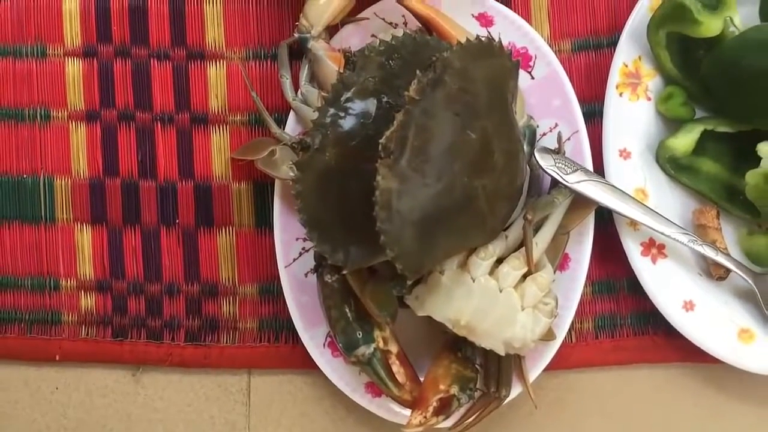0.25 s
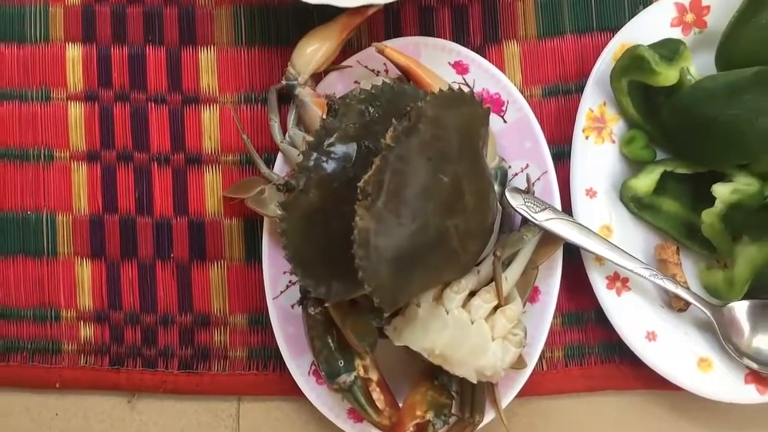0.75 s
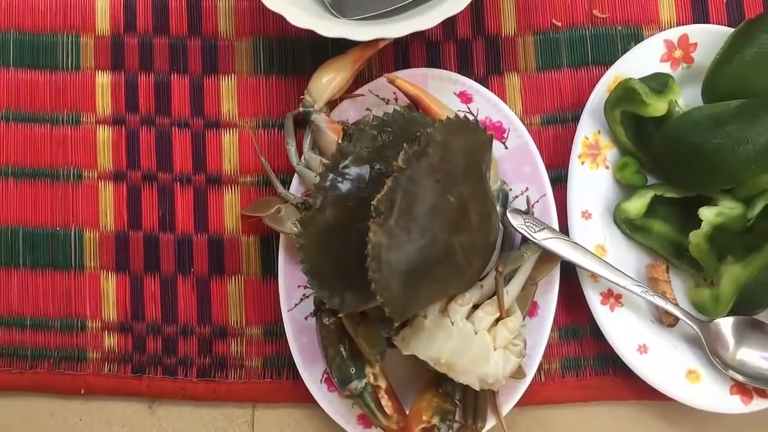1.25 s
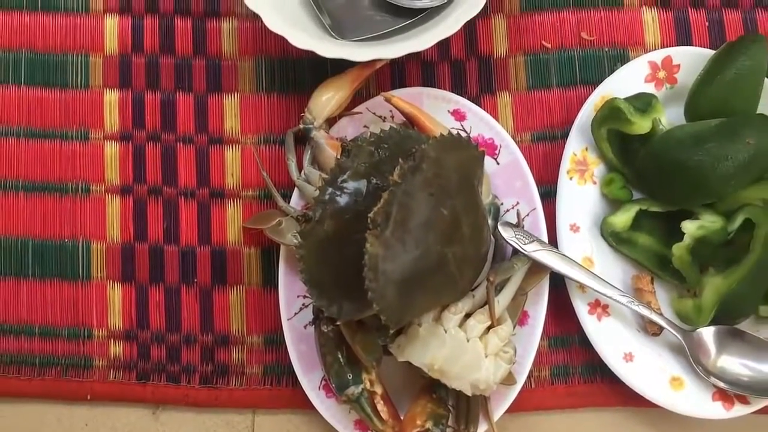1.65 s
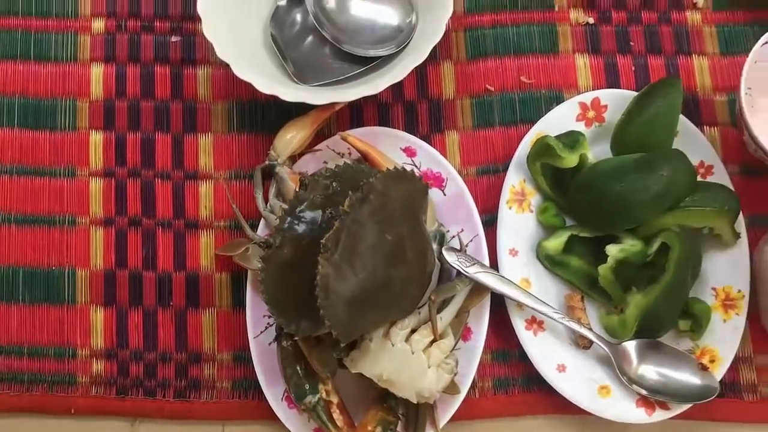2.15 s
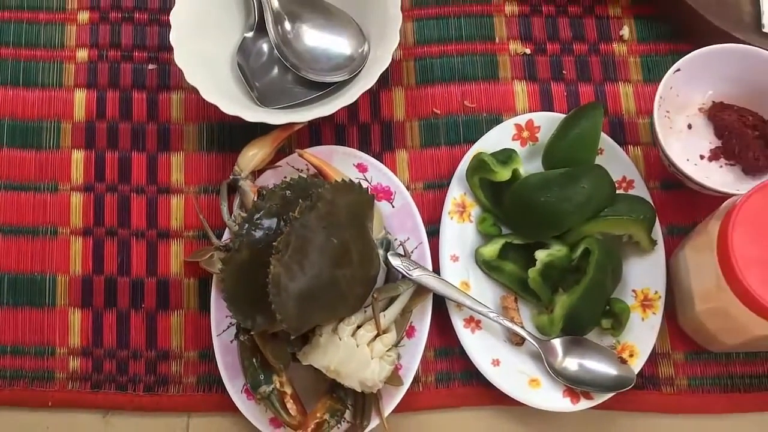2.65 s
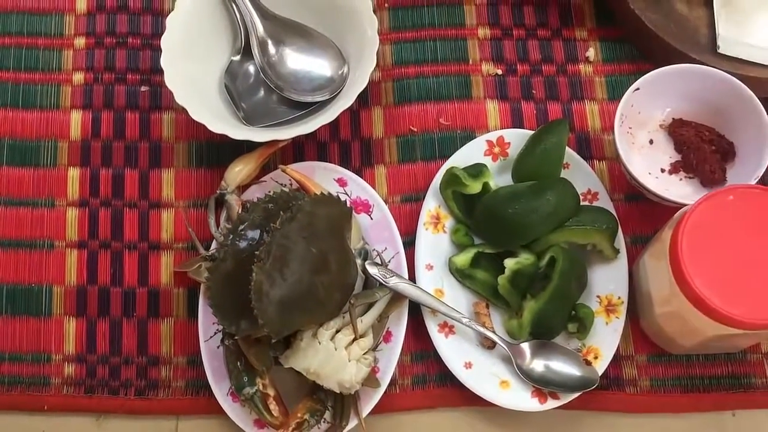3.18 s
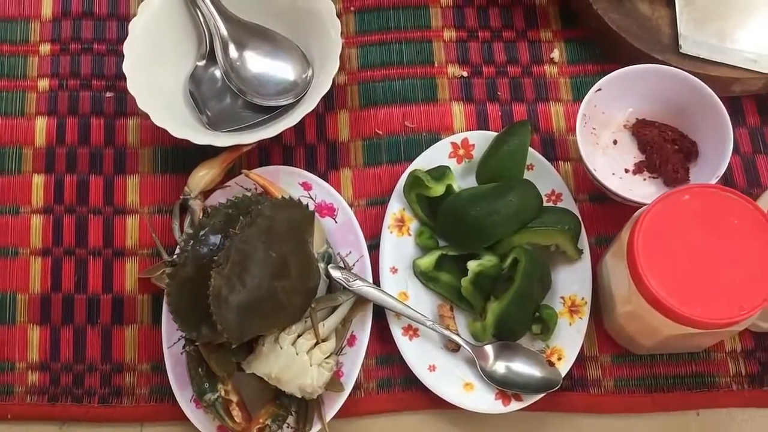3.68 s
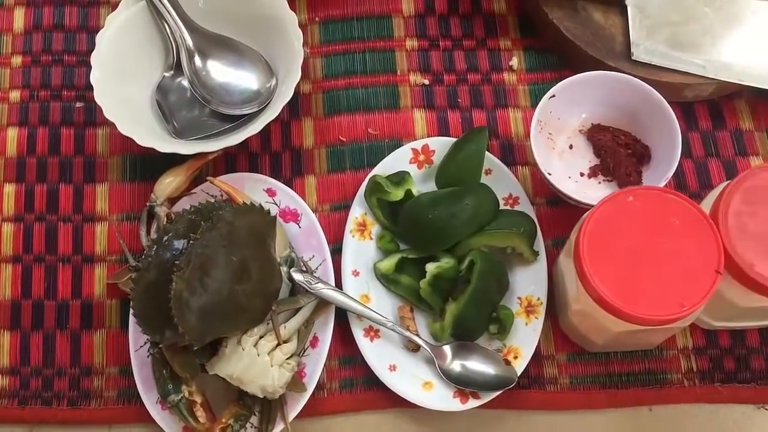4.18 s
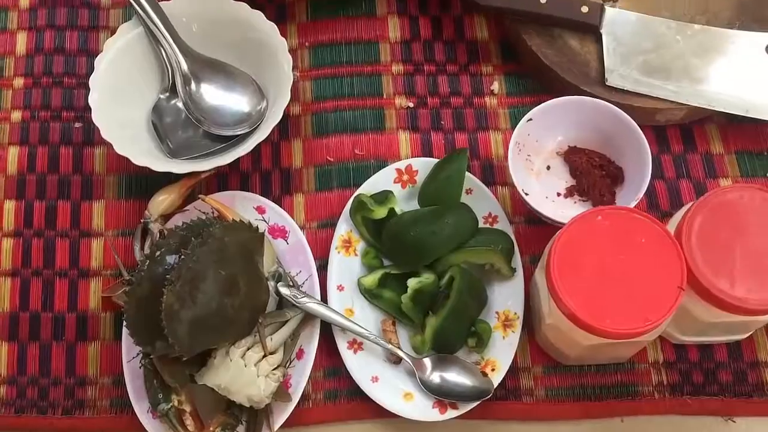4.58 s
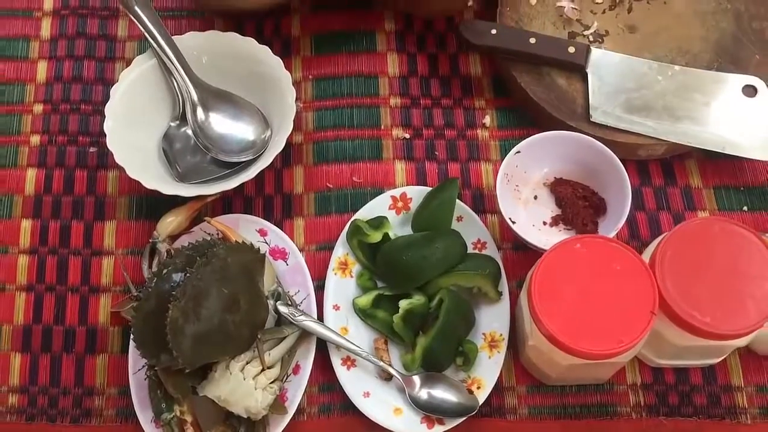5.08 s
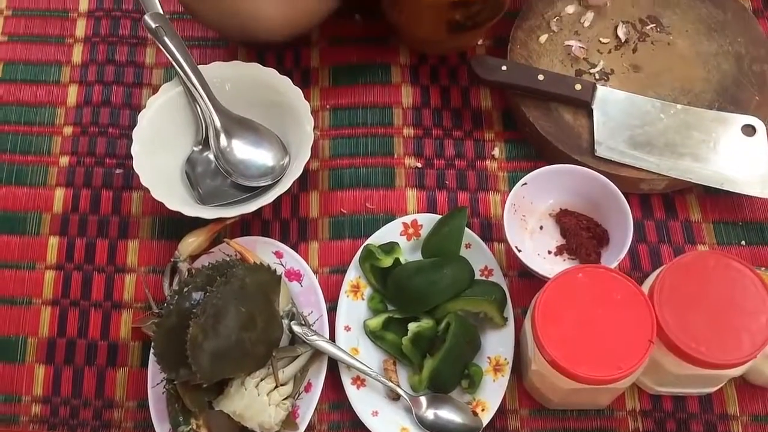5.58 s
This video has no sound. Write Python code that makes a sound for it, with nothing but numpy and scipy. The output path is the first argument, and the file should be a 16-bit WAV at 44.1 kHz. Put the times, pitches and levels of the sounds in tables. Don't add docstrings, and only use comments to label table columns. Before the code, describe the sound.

Close to a phone microphone, a wooden pestle pounds garlic in a clay mortar about every fifth of a second. Early hard knocks give way to muffled thuds, some nearly inaudible; a rim blow rings, then loud sharp knocks return before rim taps and two soft closing blows. Small bare tiled room, short reflections, low wavering traffic hum and hiss.

```python
import sys
import numpy as np
from scipy import signal
from scipy.fft import rfft, irfft
from scipy.io import wavfile
from scipy.ndimage import uniform_filter1d

SR = 44100
rng = np.random.default_rng(int(sys.argv[2]) if len(sys.argv) > 2 else 0)


def makeup_ratio(level_db):
    decades = np.asarray(level_db, float) / 20
    return 10 ** decades


def unload_audio(sound):
    columns = np.transpose(np.atleast_2d(sound))
    steps = np.round(np.clip(columns, -1, 1) * 32767)
    wavfile.write(sys.argv[1], SR, steps.astype(np.int16))


N = 257103

RIM_ROOM_DB = -5.5


def pestle():
    air, walls, slab = np.zeros((3, N))
    blows = [(row, 0) for row in soft_blows() + hard_blows()]
    blows += [(row, RIM_ROOM_DB) for row in rim_blows()]
    for (s, db, contact_ms, *how), room_db in blows:
        near, thud = blow(db, contact_ms, *how)
        start = s + 0.0032 - 0.000736 * contact_ms
        add(air, start, near)
        add(walls, start, near * makeup_ratio(room_db))
        add(slab, start, thud)
    return air, walls, slab


# start in seconds, blow in dB, contact time in ms,
# wall ring in dB, floor thud in dB.
SOFT = [(0.089, -7.5, 1.68, -13.5, -9), (0.706, -13, 1.7, -10, -4.5), (0.921, -31, 3.5, -6, -0.5),
        (1.125, -18, 3.8, -11, -2), (1.344, -19, 3.47, -13, -2.5), (1.771, -19.5, 3.1, -10.5, -5.5),
        (2.203, -33, 5.8, -2, -5), (2.416, -32.5, 3.7, -11, -18), (2.853, -10, 1.16, -4.5, -14),
        (3.907, -8, 2.03, -7.5, -16.5), (5.396, -12, 2.46, -9.5, -6.5), (5.615, -17, 3, 2, -6.5)]
SKIN_TICK_DB, SKIN_SHAFT_DB = -39, -51


def soft_blows():
    return [(s, db, ms, bowl_and_wall(wall_db), thud_db, SKIN_TICK_DB - db, SKIN_SHAFT_DB - db)
            for s, db, ms, wall_db, thud_db in SOFT]


# start in seconds, blow in dB, contact time in ms, shaft in dB, dry tick in dB.
HARD = [
    (0.299, 1, 0.87, -40, -27.5),
    (0.503, -4.5, 1, -48, -25.5),
    (3.484, -1, 0.51, -44, -46),
    (3.707, 2.5, 0.8, -35, -53),
    (4.122, 2, 0.87, -31, -39),
    (4.335, 3, 0.79, -33, -40.5),
    (4.537, 2.5, 0.72, -30.5, -52),
]
WALL_RING_DB, WALL_DB_PER_MS = -14.5, -21
HARD_THUD_DB = -24


def hard_blows():
    return [(s, db, ms, bowl_and_wall(WALL_RING_DB + WALL_DB_PER_MS * (ms - 1)), HARD_THUD_DB, tick_db, shaft_db)
            for s, db, ms, shaft_db, tick_db in HARD]


# frequency in Hz, level in dB, t60 in seconds.
BOWL = [(310, -6.5, 0.005), (469, -4, 0.0049), (590.6, 5, 0.0056), (651, -2.5, 0.019), (783, -1.5, 0.0025),
        (1860, 4, 0.016), (2015, 9, 0.0042), (2590, 12, 0.0073), (2900, -5, 0.006), (3140, 2.5, 0.014)]
# frequency in Hz, level in dB, t60 in seconds.
WALL = [(1263, 10, 0.013), (1192, -22.5, 0.11), (1213, -22.5, .22), (1484, -12, 0.17), (1102, 6, 0.019),
        (1590, -4.5, 0.035), (2350, -11, 0.094)]


def bowl_and_wall(wall_db):
    return BOWL + [(hz, db + wall_db, t60) for hz, db, t60 in WALL]


# start in seconds, blow in dB, ring t60 in seconds,
# partner mode in Hz, contact time in ms.
RIM = [
    (2.625, -5, 0.18, 1328, 0.49),
    (4.959, -7, 0.076, 1520, 0.79),
    (5.176, -9, 0.087, 1534, 0.91),
]
# frequency in Hz, level in dB, t60 in seconds.
LIP = [(470, -7.5, 0.0037), (722, -12.5, 0.014), (1060, -3.5, 0.0018), (1640, 2.5, 0.0035),
       (2180, 5.5, 0.0068), (2490, 2, 0.0057), (3027, -0.5, 0.022), (342, -12, .012)]
RING_HZ, SPLIT_HZ, RIM_RING_DB = 1432, 14, -9
RIM_PARTNER_DB, PARTNER_T60 = -7, 0.03


def rim_blows():
    rows = []
    for s, db, t60, partner_hz, ms in RIM:
        ring = [(RING_HZ - SPLIT_HZ, RIM_RING_DB, t60),
                (RING_HZ + SPLIT_HZ, RIM_RING_DB - 1, t60),
                (partner_hz, RIM_PARTNER_DB, PARTNER_T60)]
        tick_db, shaft_db = -14 - 26 * ms, -8 - 40 * ms
        rows.append((s, db, ms, LIP + ring, -32, tick_db, shaft_db))
    return rows


# frequency in Hz, level in dB, t60 in seconds.
TICK = [(1400, -2, 0.0023), (2470, -19, 0.0022), (3740, 4, 0.0092), (5820, -5, 0.017), (7900, -6, 0.011),
        (11400, -5, 0.0021)]
# frequency in Hz, level in dB, t60 in seconds.
SHAFT = [(4275, -2, 0.033), (4610, -6.5, 0.018)]
# frequency in Hz, level in dB, t60 in seconds.
SLAB = [(110, -36, .3), (144.75, 21, 0.68), (185.3, 22.5, 0.42), (240, 9.5, 0.48)]
SPOT_DB, SPOT_DRIFT = 2, 0.00018
RADIATES_HZ = 288


def blow(db, contact_ms, body, thud_db, tick_db, shaft_db):
    t = np.arange(SR // 2) / SR
    contact_ms = max(contact_ms, 0.2)
    first_touch = bell(t[:600], 0.38 * contact_ms)
    force = bell(t[:600], contact_ms) + makeup_ratio(-32.5) * first_touch

    spot = rng.standard_normal((24, 2))
    moved = [(hz * (1 + SPOT_DRIFT / (t60 + 0.0078) * a), mode_db + SPOT_DB * b, t60)
             for (hz, mode_db, t60), (a, b) in zip(TICK + body, spot)]
    tip, clay = moved[:len(TICK)], moved[len(TICK):]

    knock = signal.oaconvolve(modes(clay, t), force)[:len(t)]
    knock = signal.sosfilt(signal.butter(2, RADIATES_HZ, "high", fs=SR, output="sos"), knock)
    thud = modes(SLAB, t) * np.minimum(t / 0.005, 1)
    near = knock / abs(knock).max() + makeup_ratio(tick_db) * modes(tip, t)
    near = near + makeup_ratio(shaft_db) * modes(SHAFT, t) * np.minimum(t / 0.00054, 1)
    return makeup_ratio(db) * near, makeup_ratio(db + thud_db) * thud


def bell(t, ms):
    force = np.exp(-0.5 * (6000 * t / ms - 3) ** 2)
    return force / force.sum()


# contact in seconds, level in dB.
CRUSHES = [
    (0.3, -43),
    (.706, -52),
    (2.627, -42),
    (2.854, -47),
    (4.335, -40.5),
    (4.537, -46.5),
    (5.176, -48),
]
CRUSH_S, CRUSH_HZ = 0.015, (700, 4200)


def crush():
    t, out = np.arange(round(CRUSH_S * SR)) / SR, np.zeros(N)
    band = signal.butter(2, CRUSH_HZ, "band", fs=SR, output="sos")
    for s, db in CRUSHES:
        grains = rng.standard_normal(1200) * rng.exponential(1, 1200)
        crackle = evened(signal.sosfilt(band, grains))[:len(t)]
        add(out, s - CRUSH_S, makeup_ratio(db) * crackle * np.sqrt(t / CRUSH_S))
    return out


# delay in seconds, signed gain.
ECHOES = [(.0027, -0.72), (.0045, 0.076), (.0066, 0.046), (.0082, -0.12), (.0095, -0.2), (0.0091, -0.21),
          (0.0149, 0.29), (0.0162, 0.19), (0.0217, -0.27)]
FLUTTER_S, FLUTTER_GAIN = 0.01228, 0.35
WALL_HZ = 2500
# frequency in Hz, level in dB.
TAIL = [(200, 2), (500, -5.5), (1000, -3.5), (2000, -11), (4000, -8), (10000, -3.5)]
# frequency in Hz, t60 in seconds.
ROOM = [(150, 0.55), (400, 0.24), (1040, 0.26), (2760, 0.23), (8000, 0.13)]
# frequency in Hz, level in dB, t60 in seconds.
STANDING = [(275.5, -9, 0.27), (325, 4, 0.21), (425.6, 6.5, 0.06), (486.4, 0.5, 0.18), (565.2, -6, 0.2),
            (661.5, 6, 0.13), (744, -4.5, 0.13), (780, -9, 0.13), (890.5, 2.5, .13), (983, 0, 0.11)]
ROOM_DB, STANDING_DB = -7, -7.5


def room(x):
    early, taps = np.zeros((2, SR // 2))
    flutter = [(k * FLUTTER_S, FLUTTER_GAIN ** k) for k in range(1, 16)]
    for s, gain in ECHOES + flutter:
        early[round(s * SR)] += gain
    early = signal.lfilter(*signal.butter(1, WALL_HZ, fs=SR), early)

    at = np.arange(300, SR // 2 - 20, 20)
    taps[at + rng.integers(0, 20, len(at))] = rng.choice([-1., 1.], len(at))
    hz, t, z = signal.stft(taps, SR, nperseg=256)
    decay_db = read(TAIL, hz)[:, None] - 60 * t / read(ROOM, hz)[:, None]
    tail = signal.istft(z * makeup_ratio(decay_db), SR, nperseg=256)[1][:len(taps)]

    age = np.arange(len(taps)) / SR
    standing = modes(STANDING, age) * np.minimum(age / 0.015, 1)
    late = makeup_ratio(ROOM_DB) * tail / np.linalg.norm(tail) + makeup_ratio(STANDING_DB - 25.0) * standing
    return signal.fftconvolve(x, early + late)[:N]


# time in seconds, loudness in dB.
HUM_LEVEL = [(0.0, -32.5), (0.55, -31.5), (0.75, -30.5), (1.0, -36.5), (1.3, -30.5), (1.6, -40.5),
             (1.85, -34), (2.1, -36.5), (2.45, -42), (3.0, -44.5), (3.5, -40.5), (3.9, -33.5), (4.2, -38.5),
             (4.45, -34), (4.95, -42), (5.3, -33.5), (5.5, -40), (5.83, -36.5)]
# frequency in Hz, width in Hz, level in dB.
HUM = [(127, 54, 1), (158.5, 33, -0.5), (190, 44, 0), (227, 8.9, -10), (343, 190, -25.5)]
# frequency in Hz, width in Hz, level in dB.
RUMBLE = [(65.5, 7.4, 10), (87, 45, 5), (97.5, 8.4, -20.5)]
RUMBLE_DB, RUMBLE_FOLLOWS = -43.5, 0.068
GUST_DB, GUSTS_PER_S = 5, 4.5


def hum():
    t, loud = np.arange(N) / SR, level(HUM_LEVEL)
    rates = np.geomspace(0.3, 1.5, num=12) * GUSTS_PER_S
    gusts = evened(sum(np.sin(2 * np.pi * (rate * t + rng.random())) for rate in rates))
    deep = makeup_ratio(RUMBLE_DB + GUST_DB * gusts) * evened(loud ** RUMBLE_FOLLOWS)
    return loud * humming(HUM) + deep * humming(RUMBLE)


def humming(peaks):
    hz = np.fft.rfftfreq(N, 1 / SR)
    power = sum(makeup_ratio(2 * db) / (1 + (2 * (hz - f) / width) ** 2) ** 2 for f, width, db in peaks)
    return evened(irfft(rfft(rng.standard_normal(N)) * np.sqrt(power), N))


# closest approach in seconds, level in dB, half-amplitude time in seconds.
PASSES = [
    (2.35, -46.5, 0.32),
    (3.4, -47.5, 0.53),
]
# frequency in Hz, level in dB per Hz.
WASH = [(200, 8), (400, -1), (800, -2.5), (1100, -7), (1300, 0), (1550, -6.5), (2500, -11.5), (5000, -46)]


def wash():
    t = np.arange(N) / SR
    passing = sum(makeup_ratio(db) / (1 + ((t - s) / half) ** 2) for s, db, half in PASSES)
    return passing * coloured(WASH, patchy_db=-0.5)


# frequency in Hz, level in dB per Hz.
HISS = [(180, -59), (300, -4.5), (400, -4.5), (660, -10.5), (1280, -11.5), (2500, -15), (8500, -22.5),
        (16000, -28)]
HISS_DB = -49.5


def hiss():
    return makeup_ratio(HISS_DB) * coloured(HISS, patchy_db=1.12)


def modes(rows, t):
    x = sum((-1) ** k * makeup_ratio(db - 60 * t / t60) * np.sin(2 * np.pi * hz * t)
            for k, (hz, db, t60) in enumerate(rows))
    return x / abs(x).max()


def coloured(points, patchy_db):
    frames, hz = N // 256 + 5, np.fft.rfftfreq(1024, 1 / SR)
    a, b, patches = rng.standard_normal((frames, 513, 3)).T
    patches = uniform_filter1d(patches, size=12, axis=0)
    patches = evened(uniform_filter1d(patches, size=14, axis=1))
    z = (a + 1j * b) * makeup_ratio(read(points, hz)[:, None] + patchy_db * patches)
    return evened(signal.istft(z, nperseg=1024, noverlap=768)[1][:N])


def evened(x):
    return x / np.sqrt(np.mean(x ** 2) + 1e-20)


def read(points, hz):
    f, value = np.transpose(points)
    return np.interp(np.log(hz + 1), np.log(f + 1), value)


def level(rows):
    return makeup_ratio(np.interp(np.arange(N) / SR, *np.transpose(rows)))


def add(mix, s, sound):
    part = mix[round(s * SR):][:len(sound)]
    part += sound[:len(part)]


def scene():
    air, walls, slab = pestle()
    return (air + room(walls) + slab + hum() + hiss() + wash() + crush())[None]


def top_cut(x):
    return signal.sosfilt(signal.butter(12, 16140, fs=SR, output="sos"), x)


MIC_HZ, EDGE_HZ, CEILING = 64.7, 15900, 0.76
KNEE_DB, KNEE_WIDTH_DB, CUT_DB_PER_MS, FULL_CUT_DB = -8.5, 0.5, 4, 6.5
CUT_DELAY_S, RECOVERY_S = 0.012, 0.49


def record(dry):
    heard = signal.sosfilt(signal.butter(2, MIC_HZ, "high", fs=SR, output="sos"), dry)
    power_db = 10 * np.log10(abs(uniform_filter1d(heard[0] ** 2, size=44)) + 1e-12)
    over_ms = np.clip((power_db - KNEE_DB) / KNEE_WIDTH_DB, 0, 1) * 1000 / SR
    piled_db = signal.lfilter([CUT_DB_PER_MS], [1, -np.exp(-1 / (RECOVERY_S * SR))], over_ms)
    cut_db = FULL_CUT_DB * np.tanh(piled_db / FULL_CUT_DB)
    heard = heard / makeup_ratio(np.interp(np.arange(N) - CUT_DELAY_S * SR, np.arange(N), cut_db))
    limited = heard / (1 + (heard / CEILING) ** 6) ** (1 / 6)
    limited = signal.oaconvolve(limited, signal.firwin(255, EDGE_HZ, fs=SR)[None], "same")
    return top_cut(limited)


dry = scene()
out = record(dry)
unload_audio(out)
```